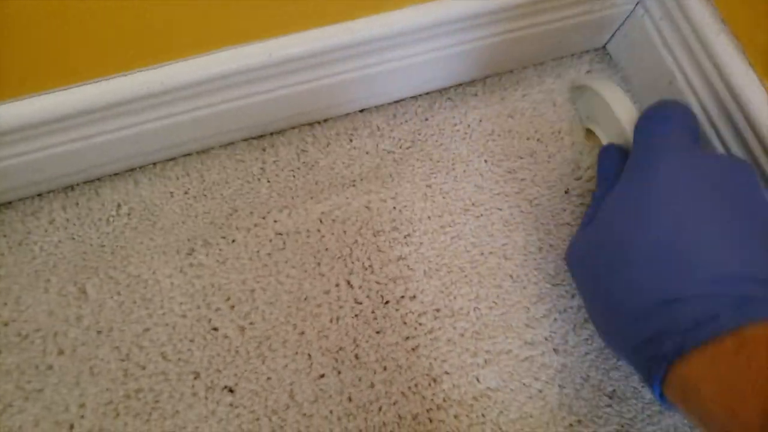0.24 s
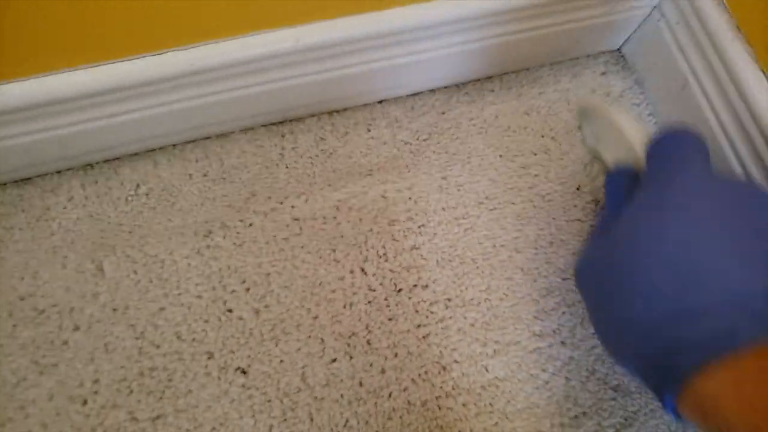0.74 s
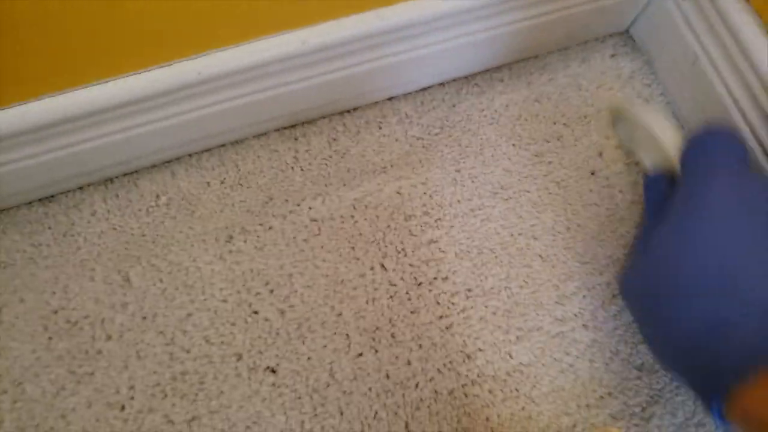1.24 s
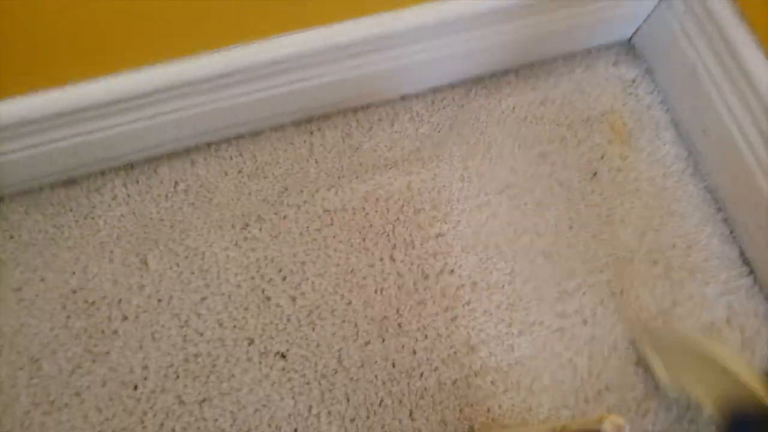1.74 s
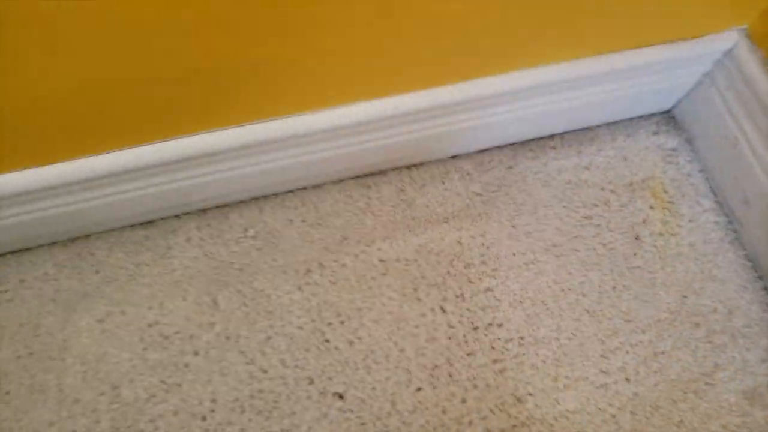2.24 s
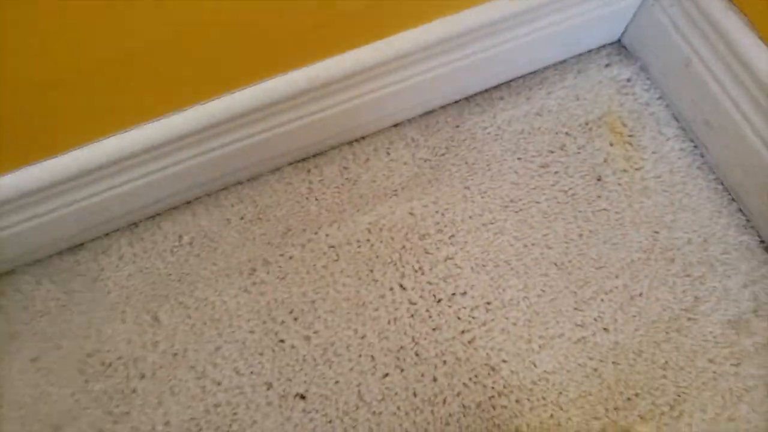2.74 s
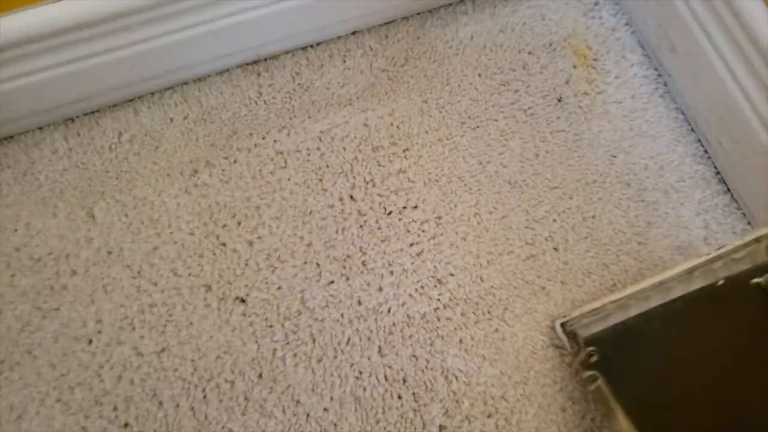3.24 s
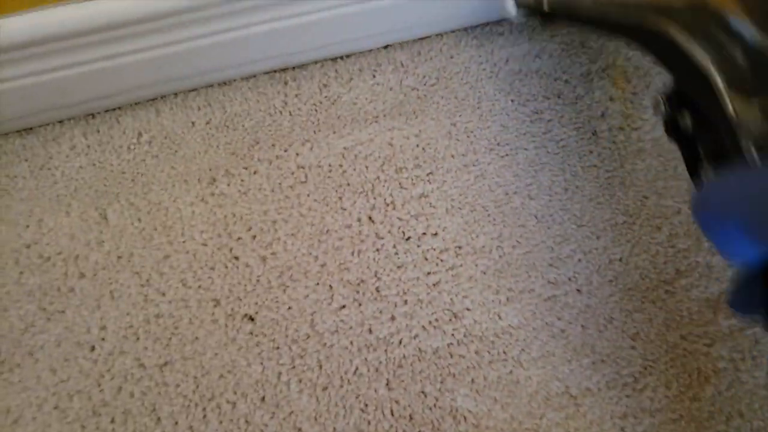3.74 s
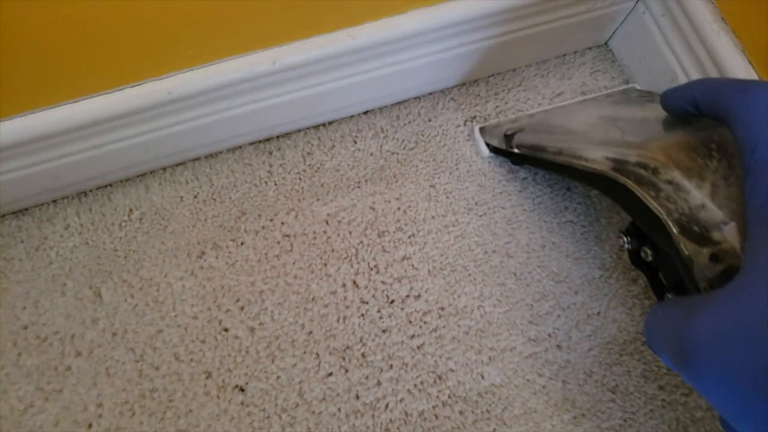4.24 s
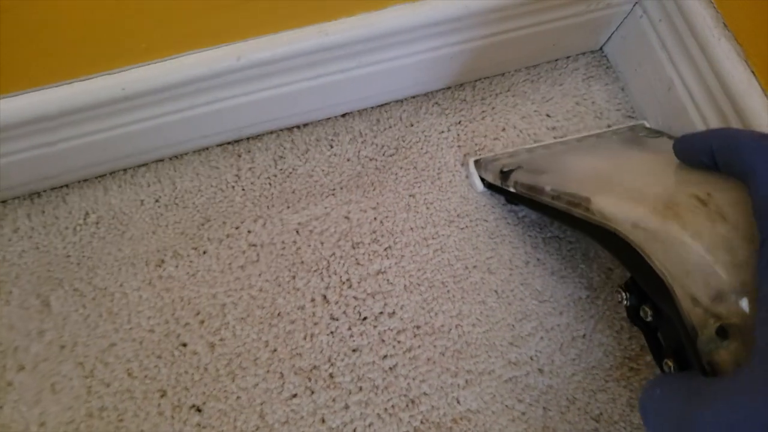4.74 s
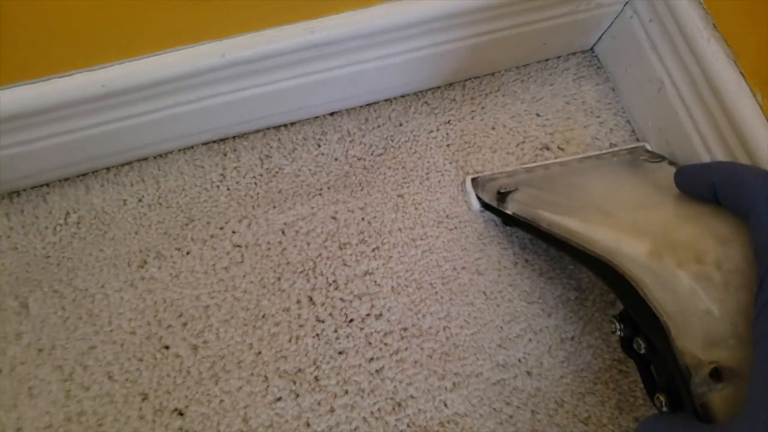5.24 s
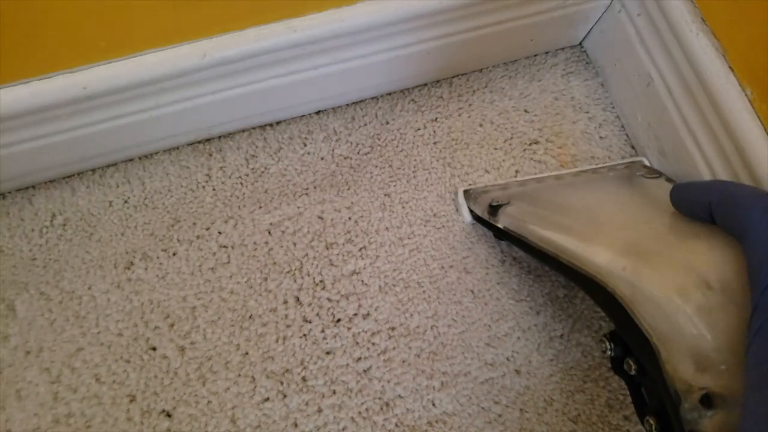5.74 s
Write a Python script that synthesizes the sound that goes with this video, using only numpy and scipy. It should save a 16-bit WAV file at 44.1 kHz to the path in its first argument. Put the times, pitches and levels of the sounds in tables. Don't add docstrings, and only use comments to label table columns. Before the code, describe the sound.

From 0 to about 3 s a carpet extractor's open hand tool hisses loudly in a room corner, bright and airy with a hollow, whistling ring in its neck. The hiss flutters and shifts slightly, weighted left, while pump and motor hum low underneath with a faint thin whine. Around 3 s the tool is lifted and the ring changes; from 3.3 s it is lowered, a hollow sweeping echo rising as a low roar and buffeting grow. At about 3.75 s hard plastic knocks the carpet with a thump, followed by smaller ticks, thuds and a brief crackle. By 3.87 s the hiss is cut off. A much quieter, muffled suck through wet fibres remains, with a short spurt and fine water spray throbbing rapidly with the pump. Hum is clearer; after 4.4 s the motor pitch creeps upward. Suction swells near 5 s, and everything slowly gets louder to the end at about 6 s.

```python
import sys
import numpy as np
from scipy import signal
from scipy.io import wavfile
from scipy.ndimage import uniform_filter1d, minimum_filter1d

SR = 44100
rng = np.random.default_rng(int(sys.argv[2]) if len(sys.argv) > 2 else 0)


def invert_db(x):
    u = np.asarray(x, float) / 20
    return 10 ** u


def store_pcm(level_fs):
    pcm = np.round(np.clip(level_fs, -1, 1) * 32767).astype(np.int16)
    wavfile.write(sys.argv[1], SR, np.atleast_2d(pcm).T)


N = 264600

HZ = np.fft.rfftfreq(512, 1 / SR)[:, None]
TIMES = np.arange(N // 128 + 6) * 128 / SR
LIFT_S, DROP_S, TOUCH_S, SEAL_S = 3.0, 3.3, 3.76, 3.868
PUMP_HZ = 29.825


def evened(x):
    return x / np.sqrt(np.mean(x ** 2) + 1e-20)


def ramp(t, start, length):
    return np.clip((t - start) / length, 0, 1)


def read(points, hz):
    f, value = np.transpose(points)
    return np.interp(np.log(hz + 1), np.log(f + 1), value)


def columns(rows, t):
    s, *values = np.transpose(rows)
    return [np.interp(t, s, v) for v in values]


def wander(t, top_hz):
    total = 0
    for f in np.geomspace(.1, 1, 24) * top_hz:
        total = total + np.sin(2 * np.pi * (f * t + rng.random())) / np.sqrt(f)
    return evened(total)


def panned(db):
    return np.array([invert_db(db / 2), invert_db(-db / 2)])


def noise(gain, lag_ms, patchy_db, hz=HZ, times=TIMES):
    # frequency in Hz, coherence from 0 to 1.
    likeness = [(60, .99), (500, .96), (800, .75), (1600, .65), (3500, .6), (6000, .5), (9000, .42),
                (15000, .36)]
    a, b, c, d, patches = rng.standard_normal((len(times), len(hz), 5)).T
    patches = uniform_filter1d(uniform_filter1d(patches, size=5, axis=0), size=30, axis=1)
    patches = evened(patches)
    same = np.clip(read(likeness, hz), 0, 1)
    right = a + 1j * b
    delayed = right * np.exp(-2j * np.pi * hz * lag_ms / 1000)
    left = same * delayed + np.sqrt(1 - same ** 2) * (c + 1j * d)
    z = np.array([left, right]) * gain * invert_db(patchy_db * patches)
    size = 2 * len(hz) - 2
    return signal.istft(z, nperseg=size, noverlap=size * 3 // 4)[1][:, :N]


def gaps(held):
    # centre in Hz, width in Hz, depth in dB.
    notches = [(7050, 300, 4.5), (4800, 200, 4), (3850, 150, 4), (2030, 150, 3)]
    # time in seconds, centre in Hz, width in Hz, length in seconds.
    shades = [
        (2.24, 4950, 450, .08),
        (2.98, 3620, 420, .09),
        (3.28, 6100, 300, .06),
        (3.42, 2000, 200, .06),
    ]
    shade_db = 22
    cut_db = np.zeros((len(HZ), len(TIMES)))
    for hz, width, db in notches:
        centre = hz * (1 + 0.014 * wander(TIMES, 4))
        flicker = np.clip(1 + .6 * wander(TIMES, 40), 0, 3)
        depth_db = db * (1 - .6 * held) * flicker
        cut_db += depth_db * np.exp(-(2 * (HZ - centre) / width) ** 2)
    for s, hz, width, length in shades:
        cut_db += shade_db * np.exp(-(2 * (HZ - hz) / width) ** 2 - (2 * (TIMES - s) / length) ** 2)
    return invert_db(-cut_db)


def slot():
    # time in seconds, hiss in dB, turn to the left port in dB, tip in dB.
    course = [(0.0, -26, 18.5, -1), (0.14, -25.5, 7, -1), (0.42, -25, 6, -5), (0.57, -27, 18.5, -0.5),
              (0.63, -25, 11.5, -3), (0.79, -25.5, 13.5, 0.5), (1.23, -25, 3.5, -1), (1.36, -26.5, 11.5, 0),
              (1.44, -25, 4.5, -2), (2.11, -26, 10.5, 3.5), (2.63, -24.5, 5.5, 4.5), (2.96, -24, 1, -8.5),
              (3.08, -26, 17, -2), (3.26, -26.5, 10.5, -3), (3.38, -28, 6, -8), (3.45, -28.5, 10, 8.5),
              (3.59, -27.5, 4, -1.5), (3.84, -33, 13, 2)]
    # frequency in Hz, density in dB per Hz.
    air = [(290, -18), (500, -20), (770, -23), (1300, -14), (2050, -10), (2700, -6), (3900, -3.5),
           (4900, -7.5), (6300, -7), (7050, -8), (8700, -10.5), (10000, -5), (12000, -3.5), (15700, -1.5)]
    # frequency in Hz, left-right difference in dB.
    shadow = [(700, 3), (1400, 13), (2070, 6), (2750, 11), (3700, 7), (4400, -2), (5500, -3), (6800, 1),
              (7400, -5), (8300, -11), (9000, -7), (11500, 0), (13600, -4), (15700, -1)]
    # centre in Hz, width in Hz, level over the hiss in dB, left-right difference in dB.
    body = [(1665, 180, 6.3, 2.5)]
    lower_neck = [(2650, 450, 9.5, 4.5)]
    upper_neck = [(3000, 450, 2.9, 2.4), (3493, 220, 8.7, 3.3)]
    lips = [(4315, 280, 11, -4), (5220, 250, 8.5, 1), (5760, 120, 5, -9), (6360, 600, 7.5, 0.5),
            (7650, 590, 4, -2), (11000, 530, 3.5, -1), (11940, 570, 0, 11), (12900, 1040, -2.5, 2),
            (14000, 970, -2, -14)]
    usual_hiss_db, usual_turn_db = -26, 9

    hiss_db, turn_db, tip_db = columns(course, TIMES)
    turn_db = turn_db - usual_turn_db
    fall = ramp(TIMES, DROP_S, TOUCH_S - DROP_S)
    held = ramp(TIMES, LIFT_S - .05, 0.087)

    grip_sag, grip_s = 0.025, 0.81
    neck_shift = 1 - grip_sag * held * (1 - ramp(TIMES, LIFT_S, grip_s) ** 2)
    lower_db = -6.5 + 0.66 * turn_db
    upper_db = -4.5 + 0.27 * turn_db + tip_db
    lip_db = -2 - 0.76 * (hiss_db - usual_hiss_db)
    power = np.ones((2, len(HZ), len(TIMES)))
    for modes, lift_db, shift in ((body, 0, 1), (lower_neck, lower_db, neck_shift),
                                  (upper_neck, upper_db, 1), (lips, lip_db, 1)):
        for hz, width, db, side_db in modes:
            centre = hz * shift * (1 + 0.01 * wander(TIMES, 7.9))
            flicker_db = 1.6 * wander(TIMES, 30)
            flare = invert_db(db + lift_db + flicker_db) * panned(side_db)[:, None, None]
            power += flare ** 2 / (1 + (2 * (HZ - centre) / width) ** 2) ** 2

    high_ms, down_ms, drop_bend = .36, .056, 2.5
    echo_ms = high_ms + (down_ms - high_ms) * fall ** drop_bend
    lying_share, held_share, echo_bend = 0.16, 0.25, 9.5
    share = lying_share + (held_share - lying_share) * held + (1 - held_share) * fall ** echo_bend
    facing = np.array([.5, .9])[:, None, None]
    bounce = np.clip(share, 0, 1) * facing / (1 + (HZ / 9000) ** 2)
    echo = bounce * np.exp(-2j * np.pi * HZ * echo_ms / 1000)
    comb = abs(1 + echo) / np.sqrt(1 + bounce ** 2)

    gust_db = 0.23 * wander(TIMES, 60)
    ports = panned(read(shadow, HZ) + 0.14 * turn_db)
    gain = np.sqrt(power) * comb * gaps(held) * ports * invert_db(read(air, HZ) + gust_db)
    t = np.arange(N) / SR
    shut = (1 - ramp(t, SEAL_S - .024, .024)) ** 2
    return invert_db(columns(course, t)[0] + 8.5) * shut * evened(noise(gain, 0.15, 1.5))


def machine():
    # frequency in Hz, density in dB per Hz.
    rumble_air = [(25, -36), (45, -18), (60, -16), (100, -9), (150, -10), (200, -13), (290, -7), (390, -7),
                  (520, -3), (600, -8), (750, -17), (1200, -15), (1600, -26), (2600, -90)]
    # multiple of the pump turn, open level in dB, loaded level in dB, waver in dB.
    hum = [(2, -49.5, -47.5, .8), (3, -70, -66, 1), (4, -59, -55, 1.5), (5, -51.5, -50, 1),
           (6, -70, -61, 1.5), (8, -65, -59, 1), (9, -57, -57, 1.2)]
    # frequency in Hz, drift in Hz, level in dB.
    fan = (1810, 5, -53)
    t = np.arange(N) / SR
    hz = np.fft.rfftfreq(2048, 1 / SR)[:, None]
    times = np.arange(N // 512 + 6)
    rumble_gain = invert_db(read(rumble_air, hz)) * np.ones(len(times))
    rumble = invert_db(-42 - 5) * evened(noise(rumble_gain, 0, 0.97, hz, times))

    load = np.clip((t - 3.8) / 0.31, 0, 1)
    tones = np.zeros(N)
    for k, open_db, load_db, waver_db in hum:
        waver = np.interp(t, TIMES, wander(TIMES, 5))
        level_db = open_db + load * (load_db - open_db) + waver_db * waver
        tones += np.sqrt(2) * invert_db(level_db) * np.sin(2 * np.pi * (round(k) * PUMP_HZ * t + rng.random()))

    race_hz, race_s, race_lag_s = 32, 4.37, .7
    shaft_hz = 298.5 + race_hz * (1 - np.exp(-np.maximum(t - race_s, 0) / race_lag_s))
    mode_hz, mode_width_hz, mode_db = 317, 5.7, 7.5
    shaft_db = -59.5 + mode_db * np.exp(-((shaft_hz - mode_hz) / mode_width_hz) ** 2)
    shaft_db += 2.0 * np.interp(t, TIMES, wander(TIMES, 12))
    tones += np.sqrt(2) * invert_db(shaft_db) * np.sin(2 * np.pi * np.cumsum(shaft_hz) / SR)

    whine_hz, width, whine_db = fan
    drift = whine_hz + width * np.interp(t, TIMES, wander(TIMES, 21.74))
    whine = invert_db(whine_db) * (1 - load) * np.sin(2 * np.pi * np.cumsum(drift) / SR)
    return (rumble + tones) * panned(1.8)[:, None] + whine * panned(9)[:, None]


def landing():
    # start in seconds, level in dB, pitch in Hz, 60 dB decay in seconds, rise in ms.
    knocks = [
        (3.7482, -19, 700, .006, .1),
        (3.7542, -7, 1000, .0045, .03),
        (3.7566, -9, 100, .05, 3),
        (3.797, -17, 1000, .01, .1),
        (3.809, -24, 170, .04, 2),
        (3.852, -22, 60, .13, 3),
    ]
    t = np.arange(N) / SR
    buffet_db, peak_s, rise, fall = -34, 3.685, 100, 140
    low_db = buffet_db - rise * np.maximum(peak_s - t, 0) - fall * np.maximum(t - peak_s, 0)
    low_band = signal.butter(3, [62, 150], "band", fs=SR, output="sos")
    low = signal.sosfilt(low_band, rng.standard_normal(N))

    far_db, near_db, bend = -42, -33, 3.7
    roar_db = far_db + (near_db - far_db) * ramp(t, DROP_S, TOUCH_S - DROP_S) ** bend
    bite = np.clip((t - 2.95) / .5, 0, 1) * np.clip((3.87 - t) / 0.022, 0, 1)
    pop_size = invert_db(1.9 * np.minimum(rng.exponential(1, N), 3)) * rng.choice([-1., 1.], N)
    pops = (rng.random(N) < 900 / SR) * pop_size
    crackle = 4.4 * pops * np.clip((t - 3.77) / 0.031, 0, 1)
    roar_band = signal.butter(2, [220, 1150], "band", fs=SR, output="sos")
    roar = signal.sosfilt(roar_band, rng.standard_normal(N) + crackle)

    out = invert_db(low_db) * evened(low) + invert_db(roar_db) * bite * evened(roar)
    for s, db, hz, t60, rise_ms in knocks:
        u = np.maximum(t - s, 0)
        push = np.sign(300 - hz)
        envelope = invert_db(db - 60 * u / t60) * (1 - np.exp(-1000 * u / rise_ms))
        out += push * envelope * np.sin(2 * np.pi * hz * u)
    return out * panned(4.0)[:, None]


def sealed():
    # frequency in Hz, density in dB per Hz.
    suck_air = [(240, -44), (400, -47), (517, -10.5), (622, -5), (803, -3.5), (1910, -6), (2080, -9.5),
                (2400, -0.5), (3240, -4.5), (3630, -2.5), (4130, -4.5), (6150, -4.5), (8770, -17),
                (10600, -44), (12000, -8), (15600, -42), (22000, -120)]
    # frequency in Hz, density in dB per Hz.
    spray_air = [(4000, -30), (6500, -14), (9000, -14), (11000, -5), (13000, -3.5), (14600, 0),
                 (15700, -.5)]
    # frequency in Hz, left-right difference in dB.
    shadow_down = [(350, 2), (1400, 8), (2070, 2), (2450, 7), (3800, 5), (4800, -2), (6900, 3), (7900, -5),
                   (9700, -3), (11700, 3), (13800, -2), (15700, 0)]
    t = np.arange(N) / SR

    settle_db, settle_s = -1, 0.16
    wet_db, wet_s, wet_rise_s = 1.8, 4.83, .3
    suck_db = -36 + settle_db * (0.5 - ramp(t, SEAL_S + settle_s / 2, settle_s / 2))
    suck_db += wet_db * ramp(t, wet_s, wet_rise_s)
    suck_gain = invert_db(suck_db) * ramp(t, SEAL_S - .04, .06)

    valve_s, open_s, drip_db = 3.895, .015, -11
    spurt_db, spurt_s = 5, 0.12
    pressure_db, pressure_s = 6, 1.63
    spray_db = -35 + spurt_db * np.exp(-np.maximum(t - valve_s, 0) / spurt_s)
    spray_db += pressure_db * ramp(t, valve_s, pressure_s)
    spray_db += drip_db * (1 - ramp(t, valve_s - open_s, open_s))
    spray_gain = invert_db(spray_db) * ramp(t, SEAL_S - .03, .02)

    ports = panned(read(shadow_down, HZ))
    suck = evened(noise(ports * invert_db(read(suck_air, HZ) + 0.23 * wander(TIMES, 30)), 0.11, 0.16))
    spray = evened(noise(ports * invert_db(read(spray_air, HZ) + .6 * wander(TIMES, 30)), .3, 0.95))
    stroke = np.sqrt(1 + 0.51 * np.cos(4 * np.pi * PUMP_HZ * t + 1.4))
    return suck_gain * suck + spray_gain * stroke * spray


def scene():
    return slot() + machine() + landing() + sealed()


def starve(x):
    hz, t, z = signal.stft(x, SR, nperseg=1024)
    narrow = uniform_filter1d(uniform_filter1d(abs(z) ** 2, size=3, axis=1), size=3, axis=2)
    narrow_db = 10 * np.log10(narrow + 1e-20)
    wide_db = uniform_filter1d(np.maximum(narrow_db, -99), size=70, axis=1)
    wide_db = uniform_filter1d(wide_db, size=5, axis=2)
    treble = ((hz > 2800) & (hz < 10500))[:, None]
    lost = (narrow_db < wide_db - 8) & treble
    kept = minimum_filter1d(minimum_filter1d(1 - .96 * lost, size=4, axis=1), size=3, axis=2)
    return signal.istft(z * kept, SR, nperseg=1024)[1][:, :N]


def band_limit(x):
    return signal.sosfilt(signal.butter(12, 17050, fs=SR, output="sos"), x)


def record(dry):
    bass_cut = signal.butter(2, 42, "high", fs=SR, output="sos")
    cut = signal.sosfilt(bass_cut, dry)
    t = np.arange(N) / SR
    open_db, sealed_db, climb = 1, .5, 2.87
    gain_db = open_db + (sealed_db - open_db) * ramp(t, TOUCH_S, 0.084)
    gain_db += climb * np.maximum(t - SEAL_S, 0)
    gained = cut * invert_db(gain_db)
    edge = signal.firwin(2001, 15730, window=("kaiser", 6), fs=SR)
    mix = signal.oaconvolve(starve(gained), edge[None], "same")
    return band_limit(mix)


dry = scene()
out = record(dry)
store_pcm(out)
```